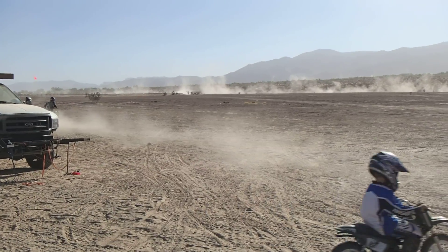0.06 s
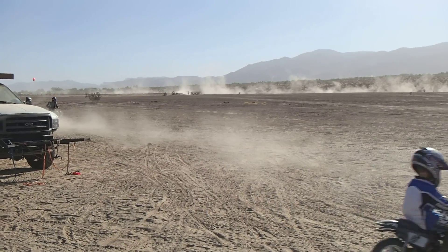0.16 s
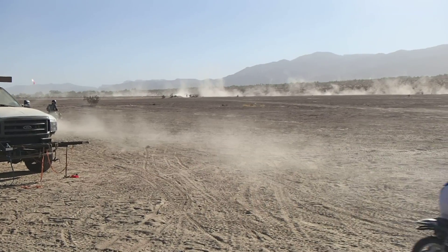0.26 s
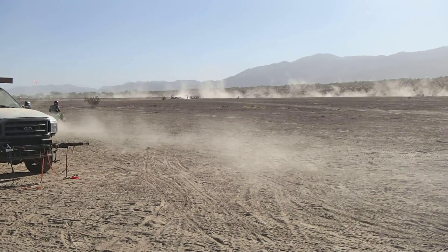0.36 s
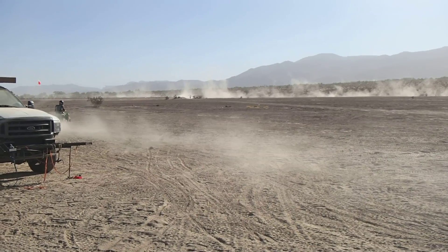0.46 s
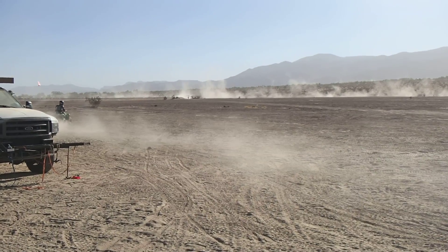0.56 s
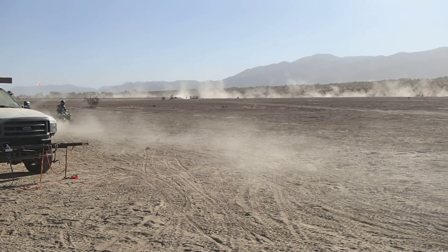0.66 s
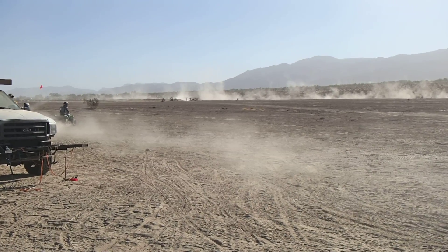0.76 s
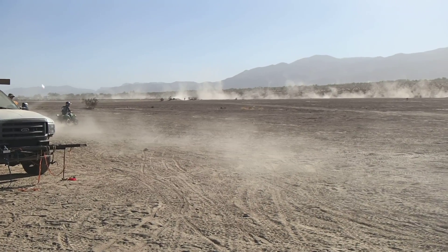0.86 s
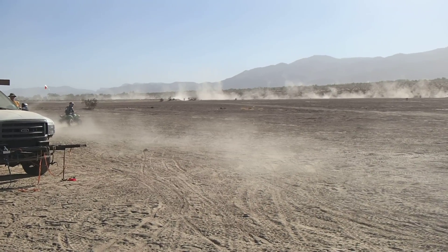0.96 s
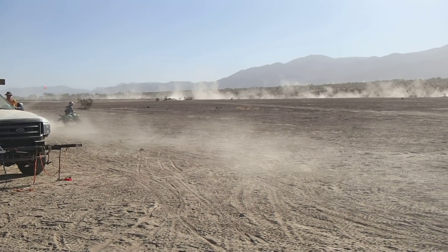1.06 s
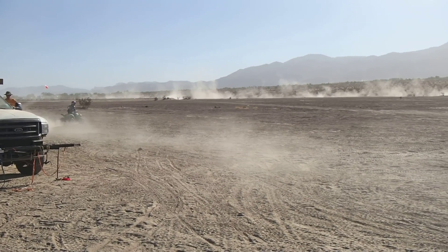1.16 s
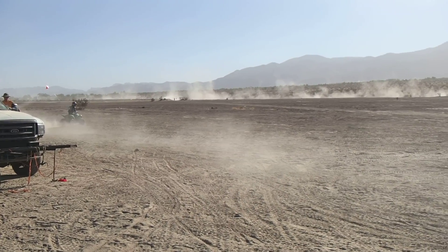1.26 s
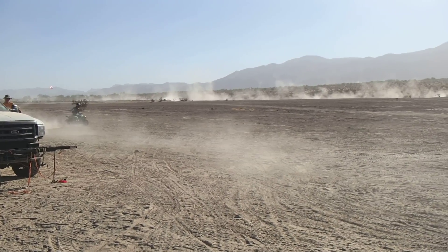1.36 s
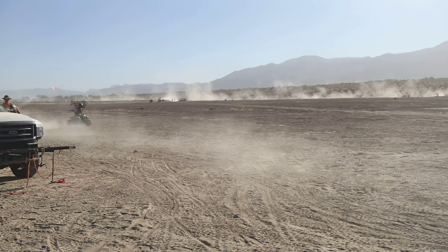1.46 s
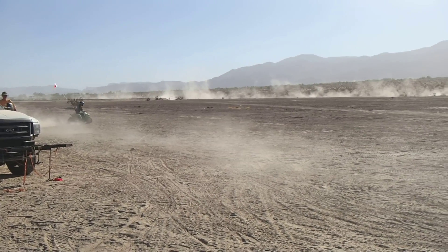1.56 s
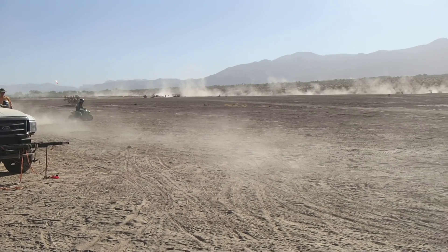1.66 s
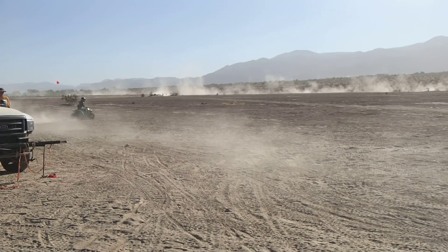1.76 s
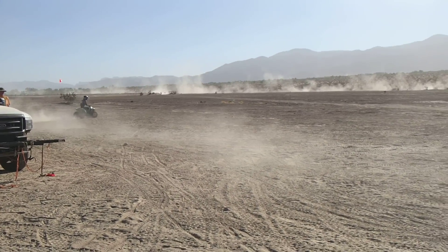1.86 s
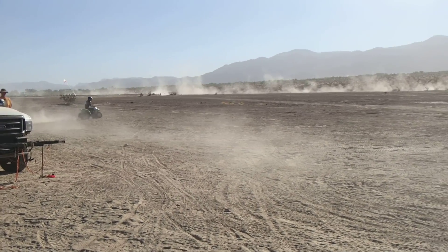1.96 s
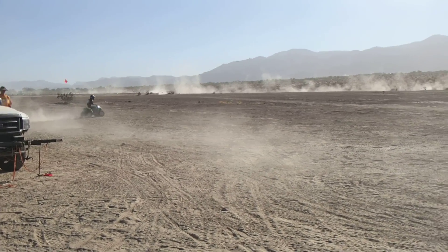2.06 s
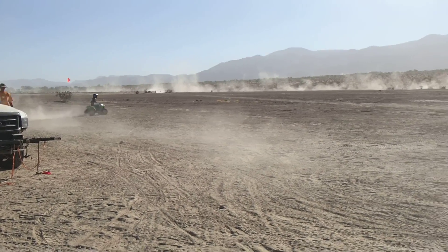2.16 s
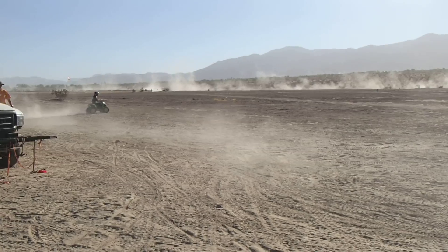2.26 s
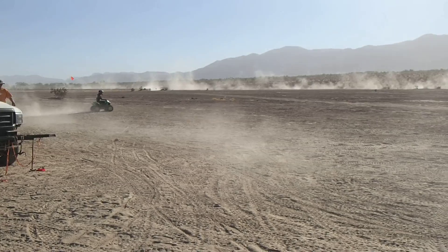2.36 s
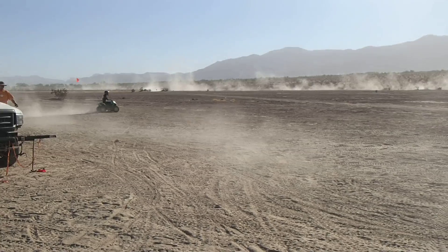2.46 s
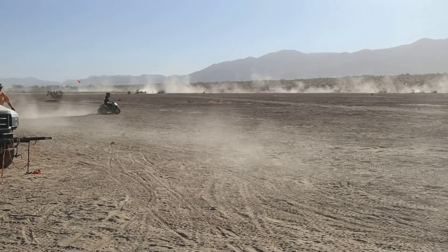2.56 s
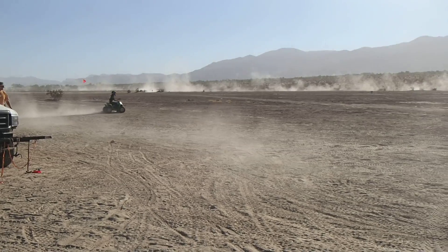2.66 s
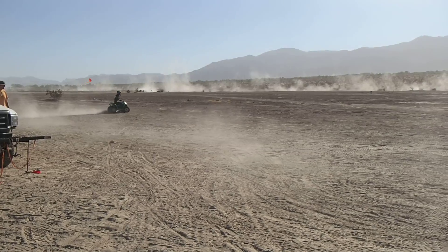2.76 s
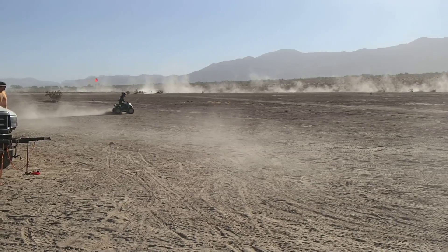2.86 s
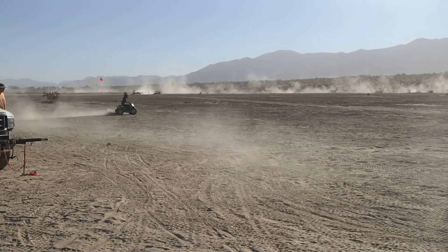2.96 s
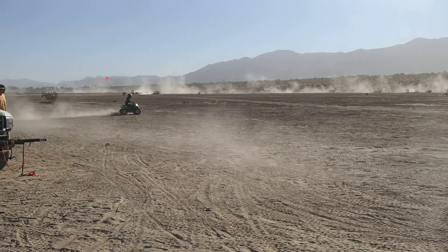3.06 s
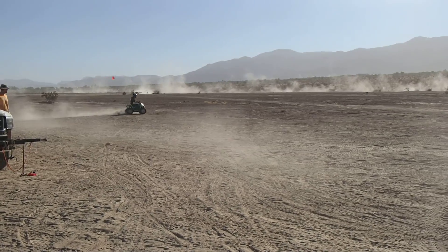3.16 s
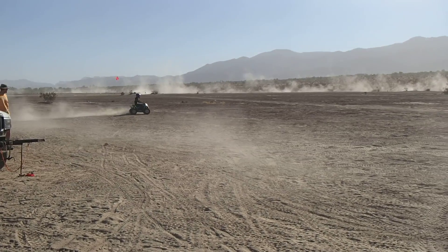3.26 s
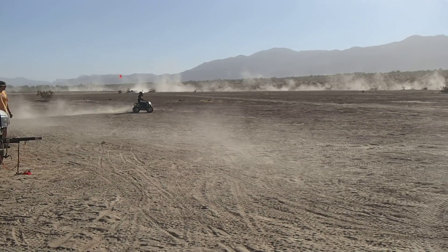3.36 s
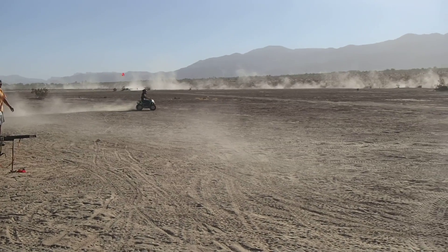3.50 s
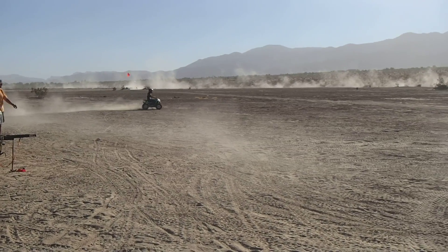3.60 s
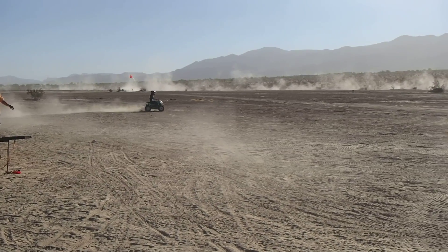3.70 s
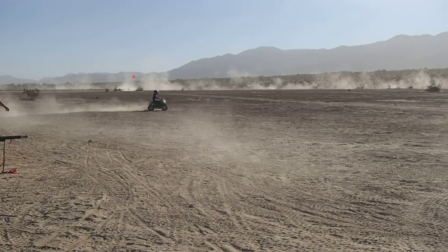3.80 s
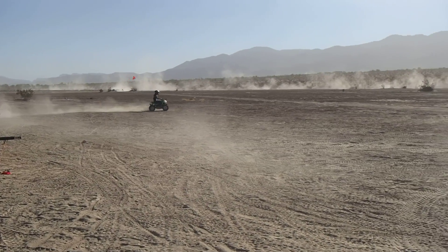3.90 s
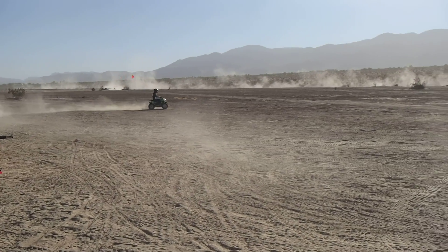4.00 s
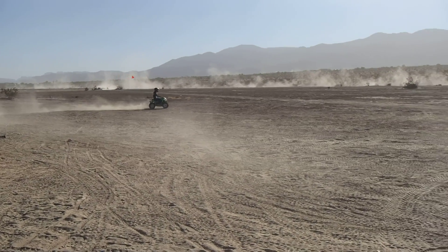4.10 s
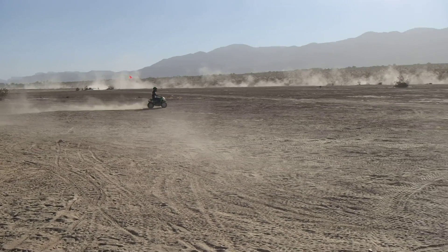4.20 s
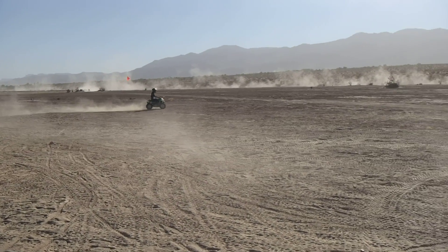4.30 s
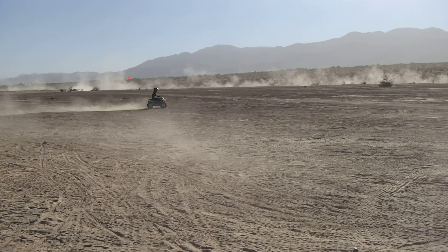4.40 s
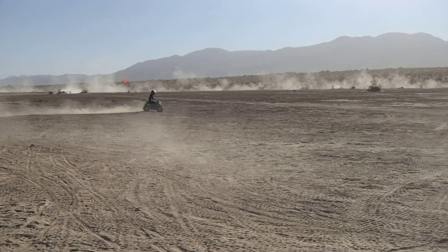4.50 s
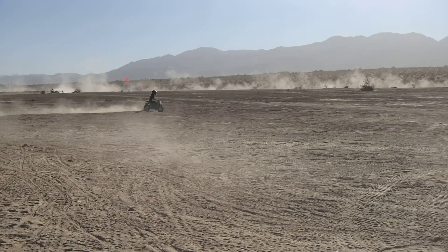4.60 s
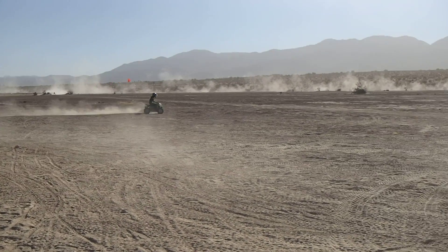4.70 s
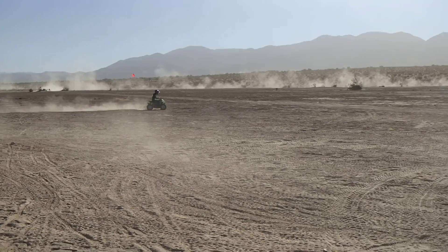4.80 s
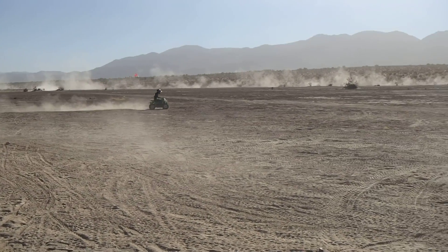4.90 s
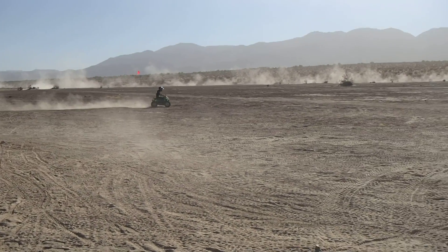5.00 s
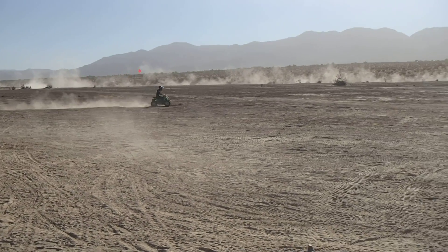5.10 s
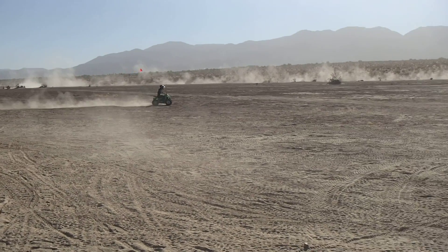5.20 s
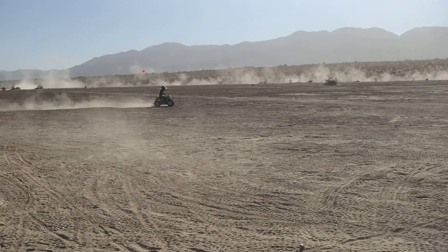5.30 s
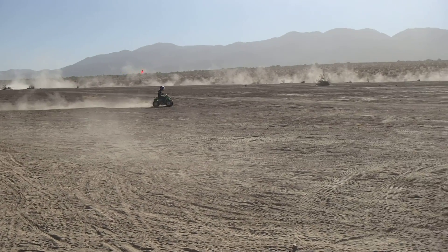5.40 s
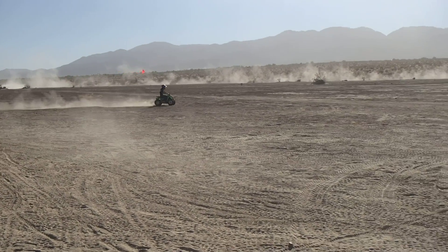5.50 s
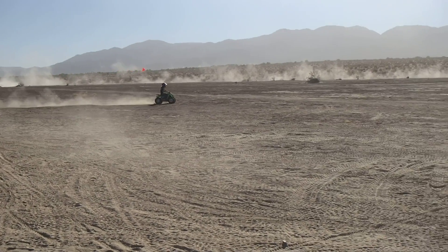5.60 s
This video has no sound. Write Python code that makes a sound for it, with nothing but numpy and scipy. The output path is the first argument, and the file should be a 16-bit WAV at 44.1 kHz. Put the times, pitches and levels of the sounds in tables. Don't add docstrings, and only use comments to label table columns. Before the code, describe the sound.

Open desert, dry and without echo. From 0 to about 0.7 s a small two-stroke engine passes a few metres away under power: a fast, raspy, metallic buzz with low intake drone, rattling loose parts and thin gear whine, dipping briefly in revs near 0.2 s. It then shuts off and coasts until about 2.1 s, revs lower, with sharp uneven pops around ten a second over soft puffing and rattle. At 2.1 s power snaps back, a steadier, more hollow buzz, fading as it leaves until 3.05 s. Quieter pops follow until 3.65 s, then a long, higher pull steadily weakens until about 5.1 s. The last half second is coasting with small faint pops as it circles far off. Throughout, gusting wind and steady light hiss lie underneath; a second engine drones far away, wandering in pitch, strongest near 3.2 s, almost lost by 4.6 s.

```python
import sys
import numpy as np
from scipy import signal
from scipy.fft import rfft, irfft
from scipy.io import wavfile
from scipy.ndimage import uniform_filter1d

SR = 44100
rng = np.random.default_rng(int(sys.argv[2]) if len(sys.argv) > 2 else 0)


def output_pcm(signal):
    pcm = np.clip(np.atleast_2d(signal).T, -1, 1) * 32767
    wavfile.write(sys.argv[1], SR, np.round(pcm).astype(np.int16))


def invert_db(x):
    u = np.asarray(x, float) / 20
    return 10 ** u


N = 249165
CRUISE_REVS = 59.5


def rms_one(x):
    return x / np.sqrt(np.mean(x ** 2) + 1e-20)


def in_time(rows):
    s, *columns = np.transpose(rows)
    return [np.interp(np.arange(N) / SR, s, c) for c in columns]


def at_hz(points, hz):
    points = np.array(points)
    return np.interp(np.log(hz), np.log(points[:, 0]), points[:, 1])


def filtered(x, order, hz, kind):
    return signal.sosfilt(signal.butter(order, hz, kind, fs=SR, output="sos"), x)


def drift(rate_hz):
    r = np.exp(-2 * np.pi * rate_hz / SR)
    slow = signal.lfilter([1], [1, -2 * r, r * r], rng.standard_normal(N + SR))
    return rms_one(slow[SR:])


def coloured(spectrum):
    hz = np.maximum(np.fft.rfftfreq(N, 1 / SR), 1)
    return rms_one(irfft(rfft(rng.standard_normal(N)) * invert_db(at_hz(spectrum, hz)), N))


def ring(drive, hz, t60):
    r, w = invert_db(-60 / (t60 * SR)), 2 * np.pi * hz / SR
    return signal.lfilter([0, np.sin(w)], [1, -2 * r * np.cos(w), r * r], drive + 1e-18)


def fade(clicks, t60):
    return signal.lfilter([1], [1, -invert_db(-60 / (t60 * SR))], clicks + 1e-18)


def at_ports(ports, sizes):
    clicks = np.zeros(N)
    clicks[ports] = sizes
    return clicks


def orders(turns, levels_db, wobble_db):
    total = 0
    for k, db in levels_db:
        level = invert_db(db + wobble_db * drift(18.0))
        total = total + level * np.sin(2 * np.pi * (k * turns + rng.random()))
    return total


def gaining_revs(rate):
    return uniform_filter1d(np.gradient(rate) * SR, int(0.1 * SR))


def machine_db(rate):
    # time in seconds, distance in metres.
    distance = [(0, 3.7), (.3, 4.2), (.6, 4.63), (1.0, 10.1), (1.6, 12.5), (2.3, 11.1), (2.8, 13.4),
                (3.3, 15), (3.9, 13.6), (4.5, 18.5), (5.1, 33), (5.65, 24)]
    # level in dB at cruising revs close by, dB per turn per s,
    # dB per turn per s per s, share of the distance loss.
    rattle_law = (-35.5, 0.27, 0.0257, 1.2)
    intake_law = (-38, 0.47, 0.04, 0.78)
    puff_law = (-42, -1.1, 0.0127, 1.3)
    whine_law = (-47, .3, -.02, .75)
    metres, = in_time(distance)
    loss_db = 20 * np.log10(metres / 4)
    gain = gaining_revs(rate)
    return [db + per_rev_db * (rate - CRUISE_REVS) + per_gain_db * gain - share * loss_db
            for db, per_rev_db, per_gain_db, share in (rattle_law, intake_law, puff_law, whine_law)]


def firings(ports, rate):
    # first time in seconds, last time in seconds, exhaust in dB at cruising revs, fading in dB per s.
    pulls = [
        (0, .73, -23.5, -2),
        (2.10, 3.055, -27.5, 3.5),
        (3.66, 5.13, -33, 4),
    ]
    # time of a coasting pop in seconds, peak in dB, dB of the weaker burn on the next turn.
    pops = [(.682, -13.5, -2), (.776, -11, -5), (.874, -12.5, -11), (.953, -12, -3), (1.052, -11, -5.5),
            (1.151, -12, -6), (1.25, -11, -14), (1.329, -12.5, -9), (1.429, -11.5, -31), (1.527, -14, -20),
            (1.607, -11.5, -30), (1.686, -14, -33), (1.766, -14, -15), (1.846, -16.5, -20),
            (1.925, -13, -20), (2.005, -18.5, -2.5), (2.084, -13.5, -5), (3.046, -28, -4),
            (3.122, -24, -1.5), (3.199, -22, -1.5), (3.297, -19, -5.5), (3.396, -18.5, -6),
            (3.494, -19, -8.5), (3.592, -22.5, -8), (3.67, -23.5, -4), (5.18, -31, -3), (5.279, -26.5, -6),
            (5.377, -28.5, -3.5), (5.476, -26.5, -7), (5.573, -28.5, -6)]
    load_db = (0.8 * (rate - CRUISE_REVS) + 0.02 * gaining_revs(rate))[ports]
    s = ports / SR
    burn, uneven = np.zeros(len(ports)), rng.standard_normal((len(ports), 2))
    for first, last, cruise_db, fading_db in pulls:
        on = (s >= first) & (s <= last)
        burn_db = cruise_db - fading_db * (s - first) + load_db + 2.0 + 0.12 * uneven[:, 0]
        burn[on] = invert_db(burn_db)[on]
    crack = burn * invert_db(-47)
    for at, peak_db, next_db in pops:
        near = np.argmin(abs(s - at)) + np.arange(-1, 2)
        pop = invert_db(peak_db - 10.0 + np.array([-20, 0, next_db]))
        burn[near] = np.maximum(burn[near], pop)
        crack[near] = pop * invert_db(11.0 - 25 + 2.5 * uneven[near, 1])
    return burn, crack


def exhaust(ports, rate):
    # time in seconds, heading (0 passing, 1 leaving, 2 circling).
    swing = [
        (0, 0.17),
        (.15, 0.038),
        (.45, 0.39),
        (.8, 0.65),
        (2.8, 1.3),
        (3.8, 1.21),
        (5.65, 3.3),
    ]
    # frequency in Hz, T60 in seconds, levels in dB passing, leaving, circling.
    pipe_modes = [(702, 0.015, -20, -2, 2), (1022, 0.013, 1.5, 4, 9), (1252.6, 0.028, -9.5, 5, 4.5),
                  (1516, 0.027, 10, -12, -17), (1823, 0.028, 5.5, -9.5, 2.5), (2090, 0.02, 4.5, -12.5, -4),
                  (2290, 0.039, -10, -7, -8), (2830, 0.023, 6, -9, -1), (3250, 0.013, -50, 1.5, -23),
                  (3550, 0.0098, -5, -7, -0.5), (3870, 0.071, -35, -26, -9.5),
                  (3815, 0.075, -43, -42, -48.5)]
    # frequency in Hz, T60 in seconds, levels in dB passing, leaving, circling.
    panel_modes = [(4700, 0.051, -51, -44.5, -60), (5010, 0.036, -34, -48.5, -48),
                   (5260, 0.0062, -74, -39, -25), (7170, 0.0077, -68, -51, -39.5),
                   (8300, 0.0067, -78, -77, -51.5)]
    burn, crack = firings(ports, rate)
    heading, = in_time(swing)
    burns = at_ports(ports, burn)
    gas = fade(burns, t60=0.085) * rng.standard_normal(N)
    blow = burns + invert_db(-41) * gas
    late = np.where(heading > .7, np.roll(blow, int(0.001209 * SR)), blow)

    pipe = np.zeros(N)
    for hz, t60, *facing_db in pipe_modes:
        drive = late if hz > 1700 else blow
        level_db = np.interp(heading, range(3), facing_db) + 0.81 * drift(15)
        pipe += ring(drive * invert_db(level_db), hz, t60)
    pipe = filtered(pipe, 4, [740, 4300], "band")
    panels = np.zeros(N)
    for hz, t60, *facing_db in panel_modes:
        panels += ring(gas * invert_db(np.interp(heading, range(3), facing_db)), hz, t60)
    thump = invert_db(-20) * 0.047 * ring(ring(blow, 234, 0.03), 234, 0.03)

    bright = filtered(rng.standard_normal(N), 3, [3500, 8800], "band")
    spit = filtered(rng.standard_normal(N), 2, 8000, "high")
    crack_envelope = fade(fade(at_ports(ports, crack * 0.076), t60=0.0012), t60=0.031)
    return pipe + thump + panels + crack_envelope * (bright + invert_db(-22) * spit)


def unfired_puffs(ports, puff_db):
    clicks = at_ports(ports, invert_db(0.6 * rng.standard_normal(len(ports))))
    gas = fade(fade(clicks, t60=.012), t60=.02) * rng.standard_normal(N)
    return invert_db(puff_db) * rms_one(ring(gas, 960, .03) + .3 * ring(gas, 1260, .025))


def intake(turns, rate, intake_db):
    # frequency in Hz, level in dB.
    air_box = [(50, -59), (120, -12.5), (180, -5.5), (237, 3), (300, -3), (360, -2.5), (420, -7),
               (500, -20.5), (600, -10.5), (680, -12)]
    levels_db = [(k, at_hz(air_box, k * rate)) for k in range(1, 12)]
    return invert_db(intake_db - 2.5) * orders(turns, levels_db, wobble_db=1.2)


def rattle(turns, rattle_db):
    # frequency in Hz, density in dB per Hz.
    loose_parts = [(200, -40), (480, -24), (700, -11), (1000, -4), (1400, -6), (1650, -11), (2000, -6),
                   (3000, -4), (4050, -8), (4400, -14), (5800, -13), (6500, -22), (8000, -30), (15000, -38)]
    shake_db = 2.0 * np.cos(2 * np.pi * (turns - .9)) + 2.0 * drift(62)
    return invert_db(rattle_db + 5.0 + shake_db) * coloured(loose_parts)


def gears(turns, whine_db):
    # teeth meeting per turn, level in dB, width in Hz.
    meshes = [(100, 0, 75), (66.5, -1, 90)]
    # time in seconds, level in dB.
    shade = [(0, 0), (.3, -3), (.75, 0), (1.2, -7), (2.05, -5), (2.25, 0), (3.1, 0), (3.4, -9), (5.65, -11)]
    whine = np.zeros(N)
    for teeth, db, width_hz in meshes:
        phase = 2 * np.pi * teeth * turns
        whine += invert_db(db) * (drift(width_hz) * np.sin(phase) + drift(width_hz) * np.cos(phase))
    return invert_db(whine_db + in_time(shade)[0] + 1.86 * drift(27)) * whine


def far_engine():
    # time in seconds, firings per s, level in dB.
    drone = [
        (0, 102, -61),
        (1.1, 90, -58),
        (2.1, 120, -61.5),
        (3.2, 104, -54),
        (4.1, 124, -68),
        (4.6, 136, -100),
        (5.65, 280, -83),
    ]
    # multiple of the firing rate, level in dB.
    drone_orders = [(1, -16.5), (2, -0.5), (3, 3), (4, 0)]
    rate, level_db = in_time(drone)
    return invert_db(level_db) * orders(np.cumsum(rate) / SR, drone_orders, wobble_db=1.6)


def plain():
    # frequency in Hz, density in dB per Hz.
    bed_spectrum = [(30, -26), (50, -10), (65, 0), (130, 3.5), (250, -1), (380, -7), (480, -13.5),
                    (650, -3.5), (950, -2), (1500, -8.5), (5000, -16.5), (7900, -28.5), (14000, -28.5),
                    (16000, -20)]
    bed = invert_db(-45.5) * coloured(bed_spectrum)
    hiss = filtered(bed, 2, 4000, "high")
    return hiss + invert_db(2.3 * drift(0.9)) * (bed - hiss)


def scene():
    # time in seconds, turns per s.
    revs = [(0.0, 58.99), (0.13, 59.74), (0.208, 55.79), (0.326, 59.13), (0.53, 59.39), (0.806, 50.64),
            (2.064, 50.2), (2.166, 56.29), (2.298, 60.25), (2.793, 59.13), (3.214, 50.71), (3.632, 51.02),
            (3.859, 60.85), (4.071, 60.84), (4.715, 59.18), (5.216, 50.81), (5.405, 50.61), (5.65, 52.34)]
    rate, = in_time(revs)
    turns = np.cumsum(rate) / SR
    ports = np.flatnonzero(np.diff(np.floor(turns - .75)))
    rattle_db, intake_db, puff_db, whine_db = machine_db(rate)
    near = exhaust(ports, rate) + unfired_puffs(ports, puff_db) + intake(turns, rate, intake_db)
    near += rattle(turns, rattle_db) + gears(turns, whine_db)
    return (near + far_engine() + plain())[None]


def roll_off(x):
    return signal.sosfilt(signal.butter(12, 16320, fs=SR, output="sos"), x)


def record(dry):
    heard = filtered(dry, 2, 55, "high")
    heard = signal.sosfilt(signal.cheby2(10, 60, 16300, fs=SR, output="sos"), heard)
    return roll_off(heard)


dry = scene()
out = record(dry)
output_pcm(out)
```